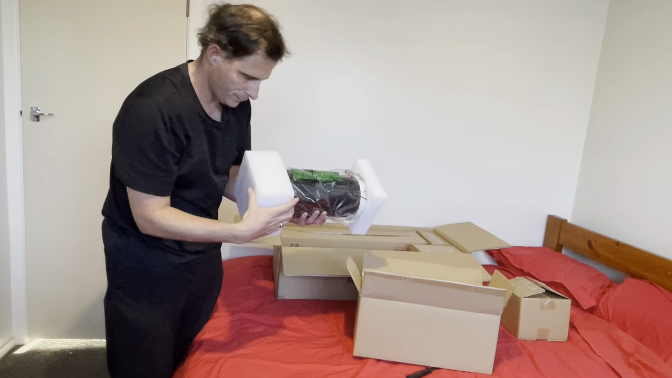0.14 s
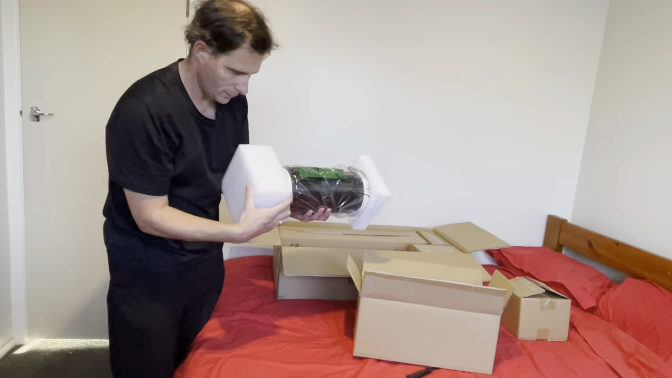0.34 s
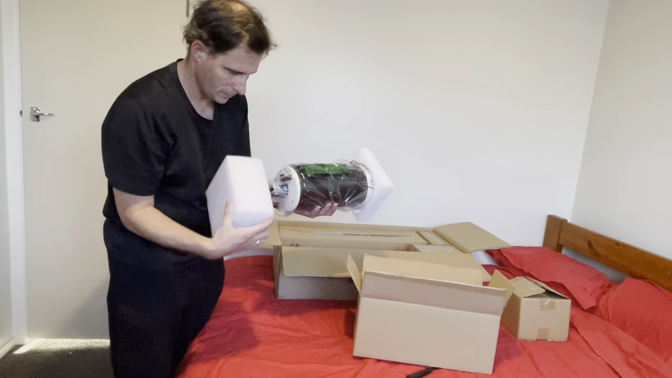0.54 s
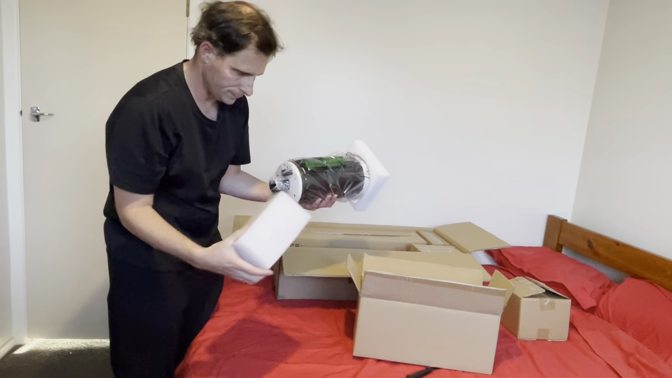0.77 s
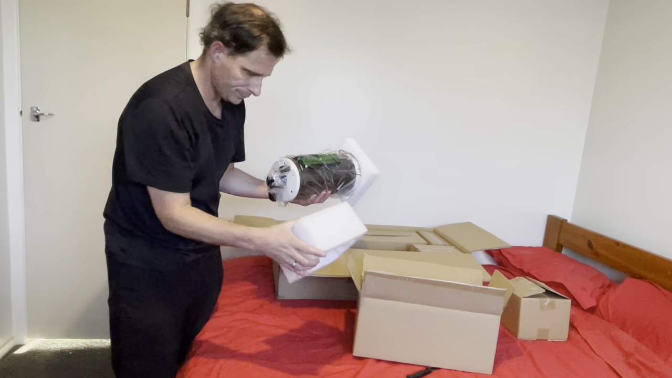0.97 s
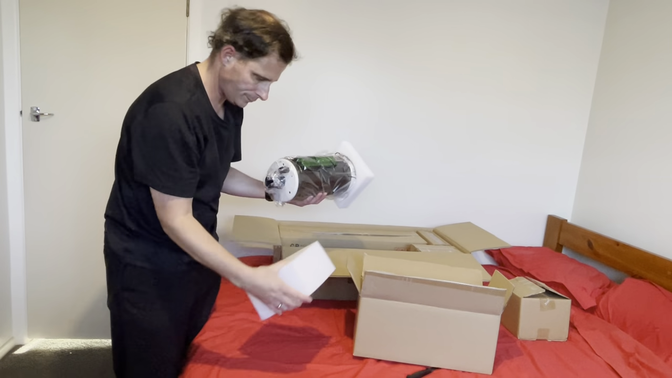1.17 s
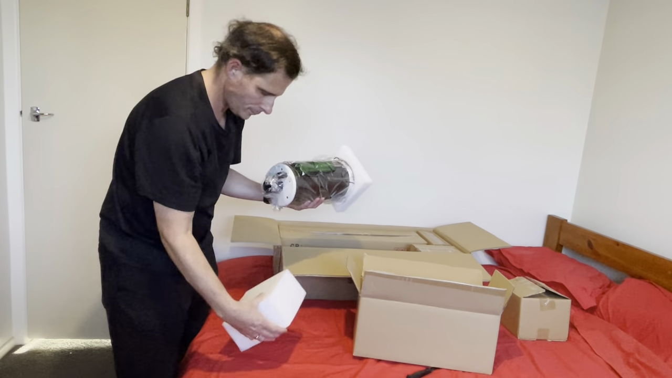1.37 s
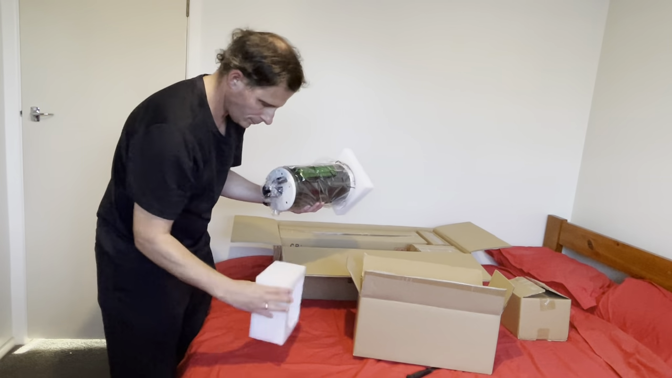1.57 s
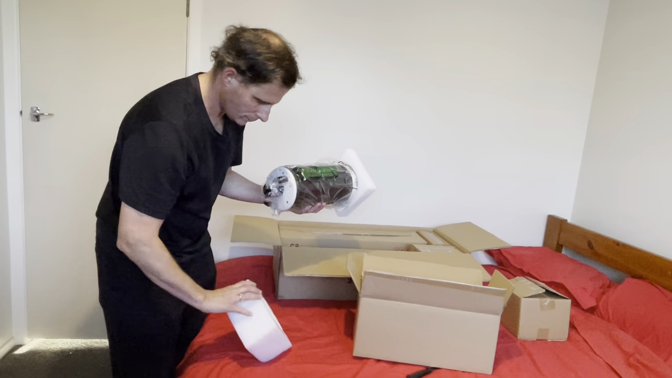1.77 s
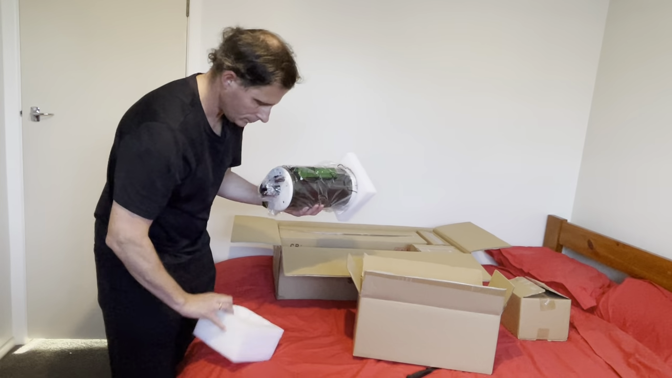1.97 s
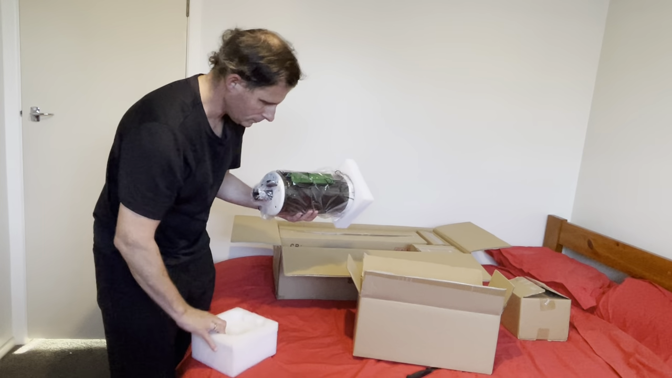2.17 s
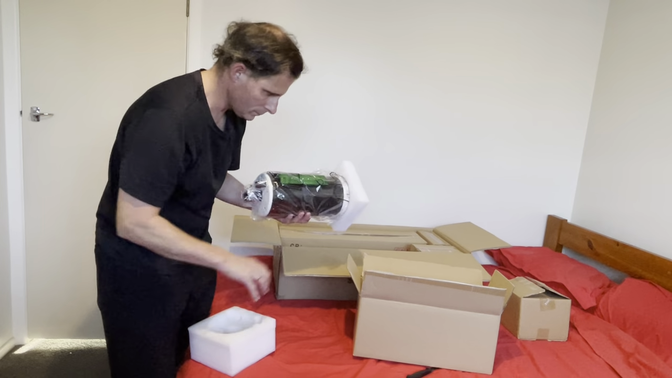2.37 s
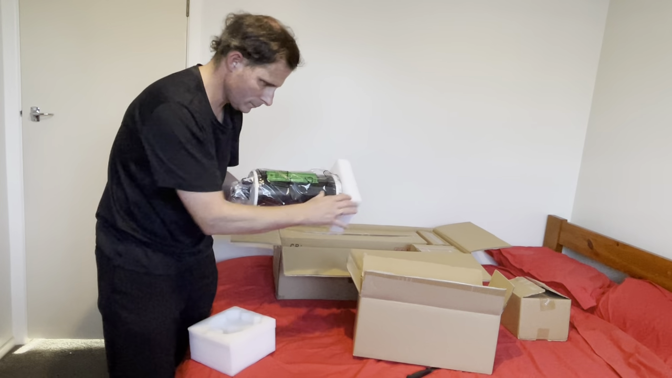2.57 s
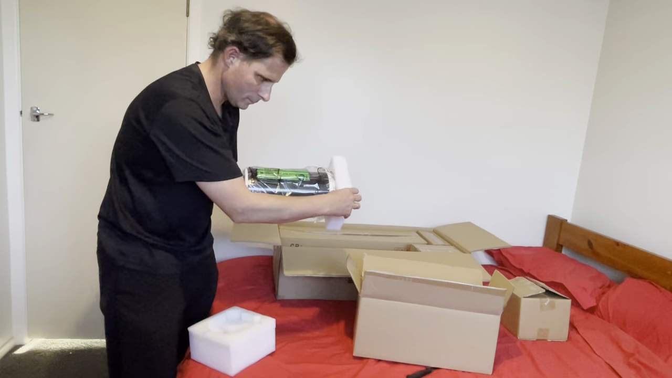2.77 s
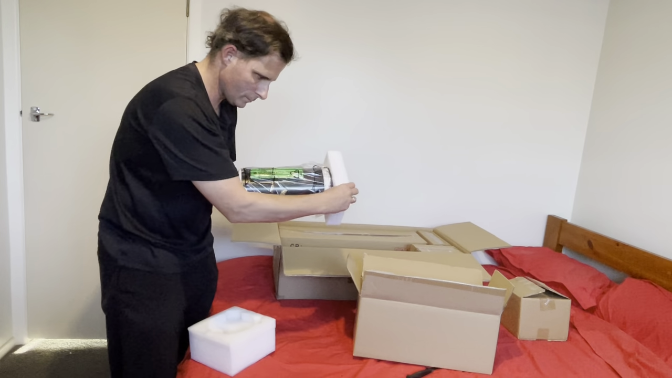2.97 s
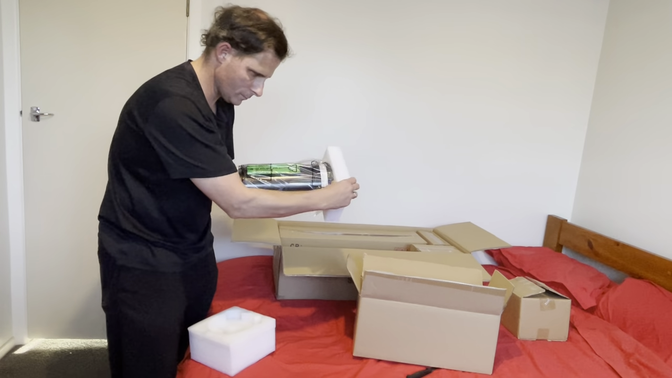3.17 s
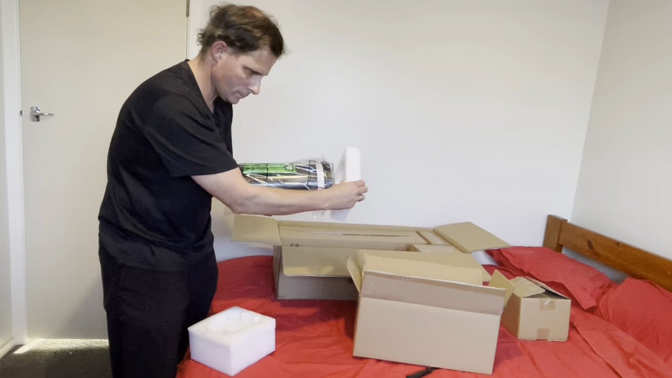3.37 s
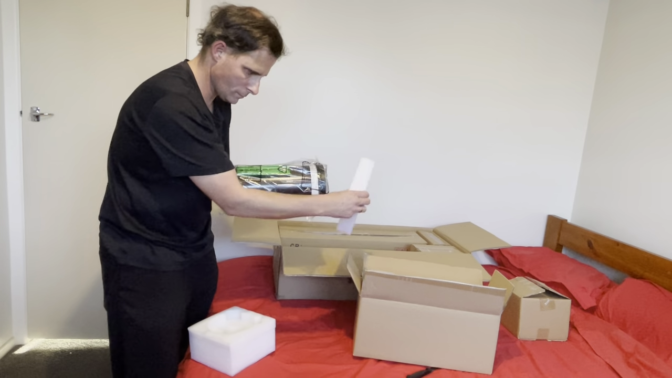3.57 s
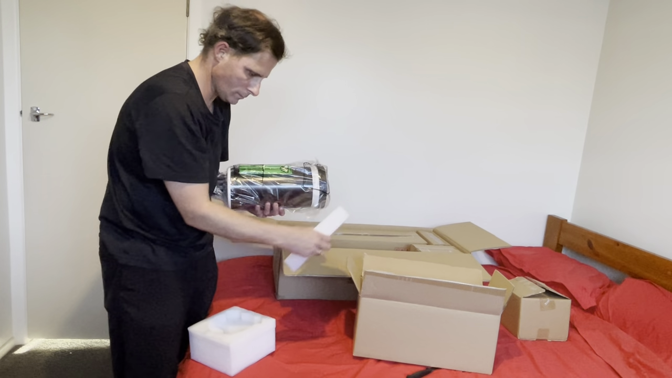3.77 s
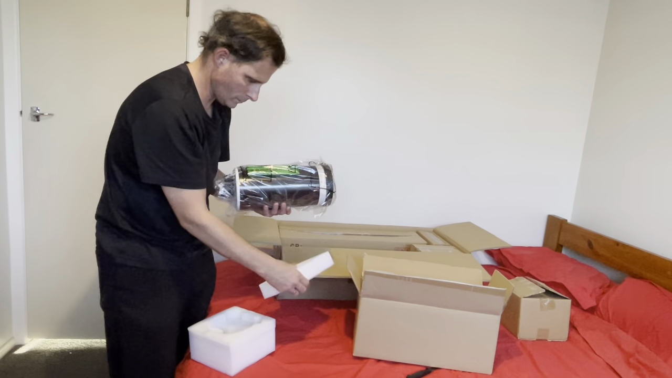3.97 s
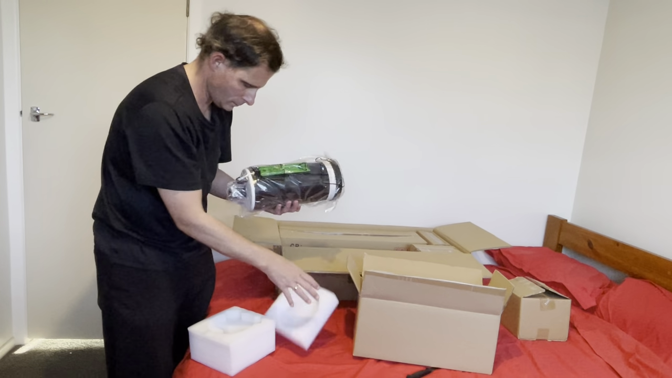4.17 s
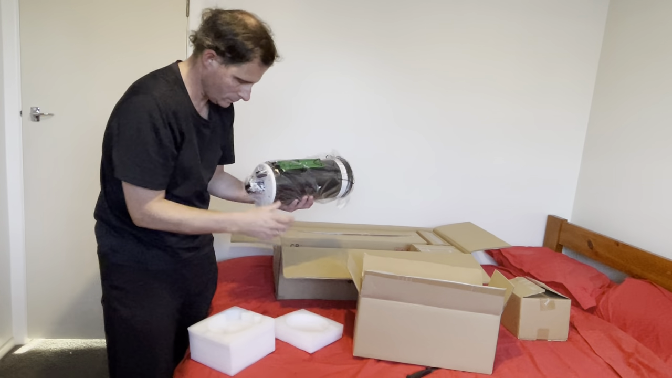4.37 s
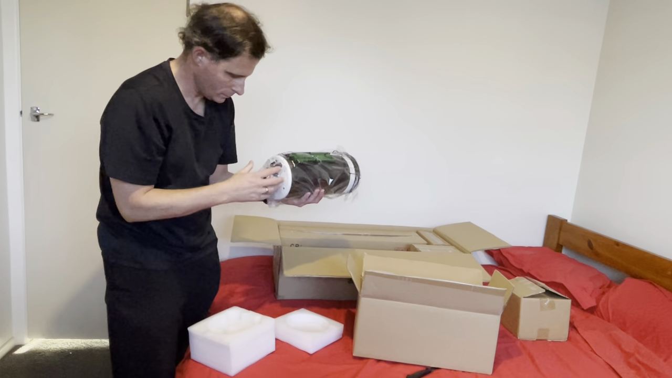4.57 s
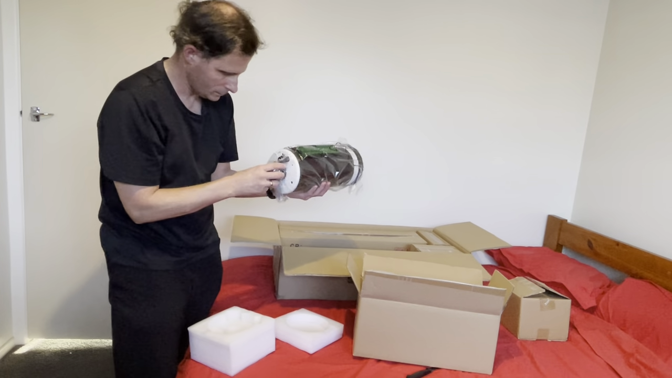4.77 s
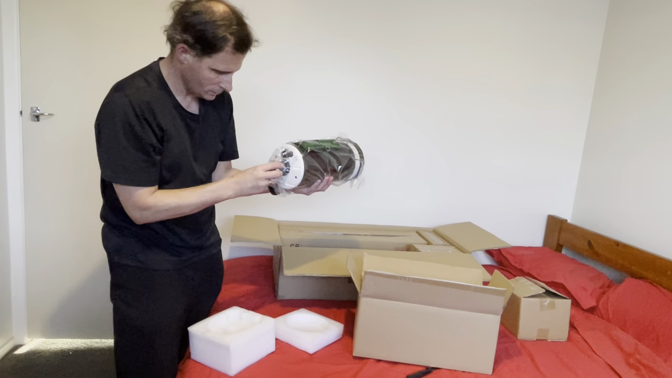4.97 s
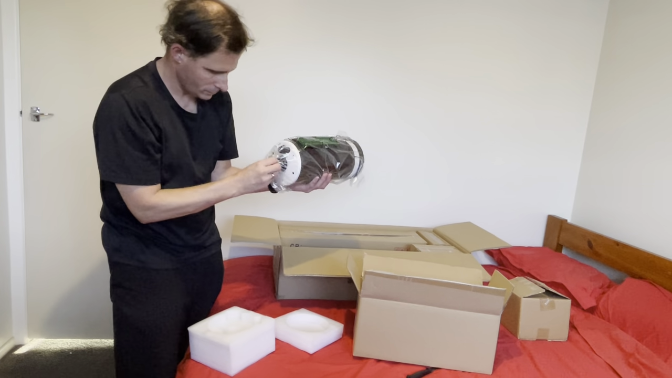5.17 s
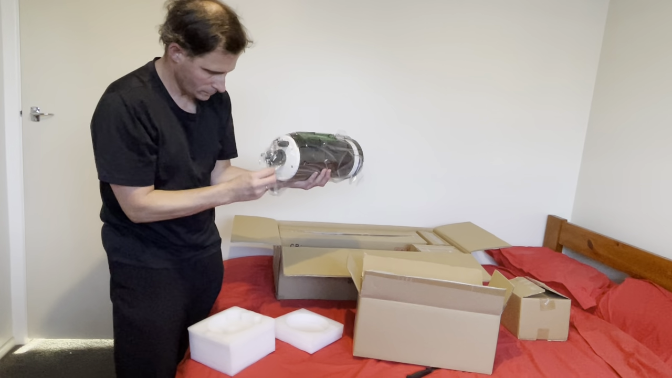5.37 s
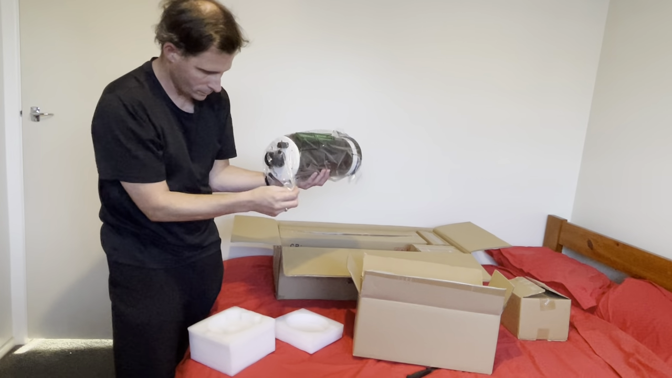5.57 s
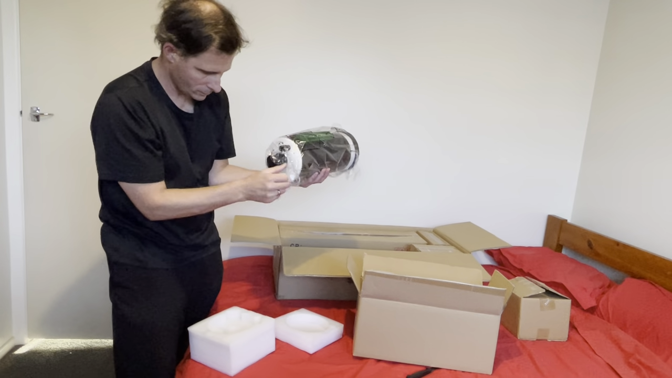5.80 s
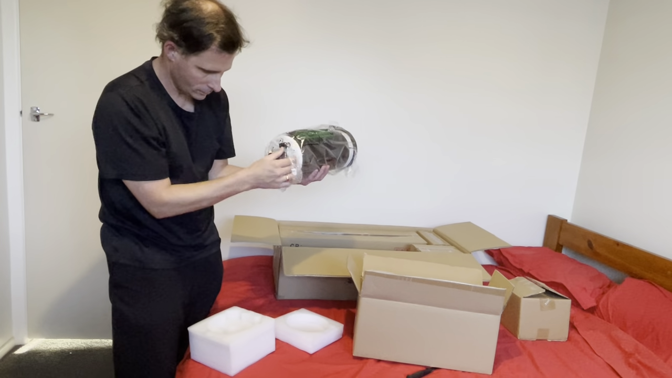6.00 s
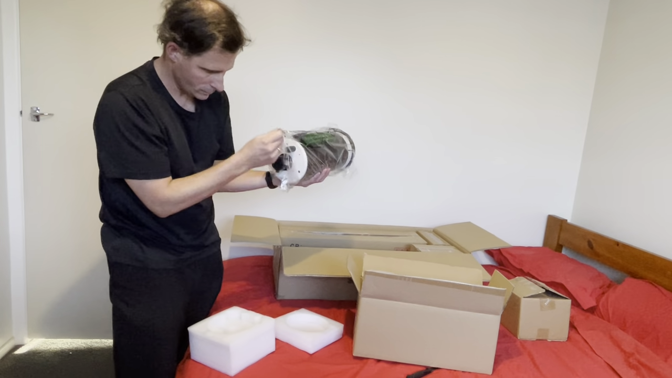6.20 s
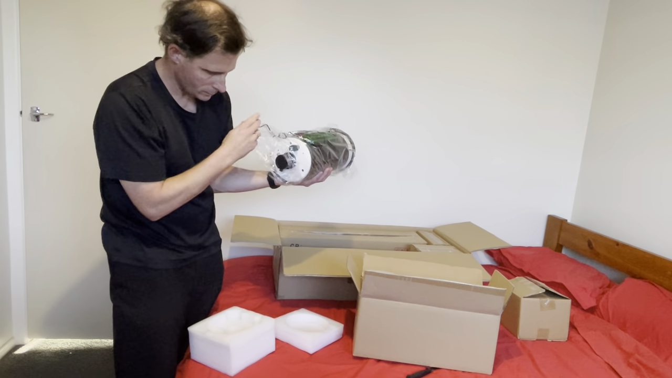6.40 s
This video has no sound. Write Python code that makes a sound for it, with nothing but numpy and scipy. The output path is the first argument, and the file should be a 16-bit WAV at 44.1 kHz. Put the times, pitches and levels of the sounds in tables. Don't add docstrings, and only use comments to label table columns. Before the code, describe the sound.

Unpacking in a bedroom: foam slides squeakily off a film-wrapped cylinder, soft mattress thumps, then plastic wrap peeled in dense crisp crackling.

```python
import sys
import numpy as np
from scipy import signal
from scipy.fft import rfft, irfft, next_fast_len
from scipy.io import wavfile
from scipy.ndimage import uniform_filter1d, map_coordinates

SR = 44100
rng = np.random.default_rng(int(sys.argv[2]) if len(sys.argv) > 2 else 0)


def unload_audio(sound):
    columns = np.transpose(np.atleast_2d(sound))
    steps = np.round(np.clip(columns, -1, 1) * 32767)
    wavfile.write(sys.argv[1], SR, steps.astype(np.int16))


def to_linear_factor(level_db):
    exponent = np.asarray(level_db, float) / 20
    return 10 ** exponent


N = 284114

# full_force_s, film_db, rise_s (per 20 dB), hold_s, foam_over_film_db
FIRST_BLOCK_STROKES = [(0.0, -50.5, .05, 0.0027, -0.5), (0.138, -54.5, 0.16, 0.0062, -0.5),
                       (0.366, -49.5, 0.2155, 0.0082, 9.5), (0.464, -71.5, 6, 0.022, -2),
                       (0.519, -63.5, 0.17, 0.025, -0.5), (0.61, -79, 0, 0.049, 8),
                       (0.66, -73, -0.54, .02, 4), (0.814, -58, .05, 0.0096, 2),
                       (0.862, -75, -0.1, 0.05, 13.5), (0.95, -79, 0.2, 0.027, -3), (1.057, -85, 0, .1, -3),
                       (1.175, -68.5, 0, 0.037, 8), (1.239, -61.5, -0.07, 0.046, 3.5),
                       (1.336, -73, 0.2, 0.025, 8), (1.378, -65.5, 0.09, 0.015, 9),
                       (1.481, -60, 0.07, 0.0036, 6), (1.581, -65, 0.24, 0.012, 2.5),
                       (1.718, -50, -0.0831, 0.028, 2), (1.833, -59, 0.18, 0.28, 5.5),
                       (2.048, -44.5, 0.08, 0.0054, 4), (2.176, -55.5, 0.28, 0.04, 4),
                       (2.264, -58, 0.48, 0.012, 5.5)]
# full_force_s, film_db, rise_s (per 20 dB), hold_s, foam_over_film_db
SECOND_BLOCK_STROKES = [(2.462, -73.5, 0.058, .05, -10), (2.561, -67.5, 0.18, 0.043, -4.5),
                        (2.658, -60.5, 0.015, 0.0031, -33), (2.787, -53.5, 0.02, 0.0093, 2.5),
                        (2.809, -51, 0.04, 0.0059, 5.5), (2.86, -59.5, .08, 0.067, 2.5),
                        (2.972, -56, 0.099, 0.017, -1), (3.069, -53, .12, 0.0052, -1),
                        (3.183, -61.5, 0.16, 0.054, 3), (3.292, -51, 0.24, 0.032, -8),
                        (3.391, -42.5, 0.14, 0.0029, 1.5), (3.5, -66, 0.07, 0.06, -10),
                        (3.594, -72, 0.097, 0.0083, 5.5), (3.688, -64, 0.06, 0.0046, -4.5),
                        (3.802, -70, 0.033, 0.0038, -5), (3.985, -74, 0.0051, .01, 9),
                        (4.026, -58.5, 0.053, .1, 8), (4.238, -58.5, 0.033, 0.0033, 1),
                        (4.408, -67, 0.089, 0.0046, 5.5), (4.456, -75, .03, 0.016, 4),
                        (4.503, -71, .02, .005, -21), (4.562, -79, 0.045, 0.053, -7)]
# full_force_s, film_db, rise_s (per 20 dB), hold_s, foam_over_film_db
PEELING_STROKES = [(4.631, -58.5, 0.034, 0.041, -2.5), (4.702, -52.5, 0.048, 0.03, -7),
                   (4.74, -52, 0.12, 0.037, -3.5), (4.81, -55, 0.18, 0.034, 0),
                   (4.921, -52, 0.29, 0.062, 0.5), (5.1, -53.5, 0.21, 0.0045, 0.5),
                   (5.164, -53, 0.12, 0.026, -7), (5.326, -47.5, 0.19, 0.11, 3.5),
                   (5.507, -43.5, 0.22, 0.017, 3), (5.58, -51.5, 0.29, 0.08, -6),
                   (5.67, -47, 0.24, 0.052, -2), (5.78, -57, 0.55, 0.13, 2.5),
                   (6.0, -52.5, 0.31, 0.057, 0.5), (6.083, -44, 0.05, 0.069, -3.5),
                   (6.18, -39, 0.03, 0.023, -3), (6.255, -44.5, 0.34, 0.1, 1.5),
                   (6.394, -40.5, 0.27, 0.0027, -5.5)]
# full_force_s, level_db, rise_s (per 20 dB), hold_s
GRIPS = [(0.13, -57.5, -0.2, 0.0089), (0.314, -50.5, 0.14, 0.083), (1.333, -64.5, 0.57, 0.057),
         (1.6, -62, 0.4, .005), (1.792, -60.5, -8, 0.0045), (2.06, -54, -0.6, 0.033),
         (2.807, -49.5, -0.05, .005), (3.087, -68.5, -0.04, .005), (3.24, -65, 0.18, .08),
         (3.341, -46.5, -0.08, .005), (3.382, -41, -0.024, 0.0031), (3.996, -58, 0.04, .005),
         (4.123, -55.5, 0.09, 0.0063), (4.23, -52.5, -0.22, 0.0044), (4.716, -64, .05, 0.093),
         (5.097, -63, 0.18, 0.084), (5.34, -48.5, 0.17, 0.082), (5.51, -50, 0.19, .005),
         (5.654, -50.5, 0.13, .005), (6.197, -50.5, 0.5, 0.017), (6.377, -47.5, 0.6, .005)]
# time_s, pitch_hz
FOAM_PITCH = [(0.0, 1343), (.45, 1197), (.54, 822), (.64, 1400), (1.001, 1115), (1.87, 1465), (1.939, 856),
              (2.1, 1474), (2.33, 1194), (2.799, 1790), (3.0, 1920), (3.201, 1010), (3.29, 1400),
              (3.359, 960), (4.0, 1200), (4.12, 1790), (4.232, 930), (4.7, 1890), (5.35, 1640),
              (6.44, 1327)]
# frequency_hz, level_db (per Hz)
FILM_SPECTRUM = [(1500, -18), (1810, -9), (3140, -6.5), (4220, -5.5), (5550, -5.5), (6440, -5), (8730, -8),
                 (8800, -4.5)]
# frequency_hz, level_db
FILM_TOP = [(8600, 0), (9200, 1), (10200, 0), (11900, -11), (12600, -18), (13300, -24), (14000, -50),
            (16000, -70)]
# frequency_hz, level_db (per Hz)
HOLLOW_SPECTRUM = [(120, -13.5), (200, -4.5), (300, -2), (420, -0.5), (560, 2.5), (750, -0.5), (1200, -64)]
# start_s, peak_db, t60_s
TICKS = [(0.0958, -33.5, 0.16), (.209, -36, 0.38), (0.7435, -48, 0.097), (0.761, -47, 0.21),
         (1.23, -40, 0.35), (1.4553, -56.5, .1), (1.7144, -53, .041), (2.4507, -48, .1),
         (2.5498, -35.5, 0.045), (2.6632, -37, 0.099), (2.7816, -46, 0.048), (2.841, -30, 0.11),
         (2.964, -32.5, 0.1), (3.14, -31, 0.075), (3.273, -26.5, .095), (3.682, -53.5, .065),
         (3.8023, -47, 0.088), (4.358, -48, 0.037), (4.49, -48.5, 0.089), (4.5775, -52, 0.05),
         (4.6214, -45.5, 0.068), (4.655, -59, 0.042), (4.6806, -42, .08), (4.685, -32.5, 0.09),
         (5.166, -32, 0.044), (5.6924, -46, 0.07)]
# start_s, peak_db, knock_over_snap_db, knock_hz
KNOCKS = [(0.249, -46, -9, 1840), (.5177, -47, -7, 785), (0.7895, -45, -11, 1750),
          (1.1682, -48.5, -6.5, 1310), (1.5537, -37.5, -8.5, 680), (2.0343, -32, -7, 1376),
          (2.0829, -26.5, -2, 1930), (2.2641, -37.5, -3, 834), (3.3875, -22.5, -13.5, 1230),
          (3.6598, -68, 6, 1710), (3.9784, -51, 1, 1204), (4.0113, -38.5, -17, 1160),
          (4.0641, -36, -5, 525), (4.2198, -49, 6.5, 560), (4.385, -54, 4, 613), (4.4, -41, -8, 1910),
          (5.2811, -30.5, -12, 1790), (5.4968, -24, -11.5, 530), (6.0532, -34.5, -4.5, 1295),
          (6.1769, -23.5, -5, 1160), (6.3344, -30, -20, 636)]
# start_s, peak_db
FLICKS = [(0.7437, -53), (2.6614, -48), (2.7816, -56), (4.357, -56), (4.4907, -49), (4.5775, -59),
          (4.6204, -50), (4.6563, -50.5), (4.6818, -33.5), (5.1664, -35), (5.692, -31)]
# start_s, length_s, level_db
SHEEN = [(0.092, 0.065, -82.5), (0.201, 0.044, -84), (2.638, 0.038, -89), (2.773, 0.032, -92),
         (2.826, 0.054, -77), (3.315, 0.054, -78), (4.666, 0.07, -87), (5.06, 0.057, -87.5),
         (5.268, 0.26, -76), (5.676, 0.042, -74), (5.876, 0.05, -81), (6.081, 0.33, -73)]
# full_force_s, level_db, rise_s (per 20 dB), hold_s, pitch_hz
SQUEAKS = [(0.108, -65.5, -0.18, 0.042, 1200), (0.256, -59.5, 0.1, 0.042, 1150),
           (0.326, -52, -0.54, 0.037, 1240), (0.521, -66, -0.7, 0.016, 830),
           (1.73, -57.5, 0.03, 0.086, 1310), (1.889, -60.5, -0.2, 0.041, 808),
           (1.96, -55.5, 0.1, 0.043, 838), (2.02, -48.5, .02, .025, 1426), (2.089, -47.5, .03, 0.02, 1880),
           (2.155, -49.5, 0, 0.053, 1415), (2.24, -72, 0.3, 0.011, 1400), (2.65, -69, .01, 0.027, 1580),
           (2.695, -77, -0.2, 0.016, 1400), (3.214, -70, -0.44, 0.046, 1180),
           (4.394, -69.5, 0.12, 0.023, 628), (4.726, -65.5, -0.02, 0.26, 2030),
           (5.088, -60.5, -0.01, .12, 1950), (5.3, -50.5, 0, 0.18, 1900), (5.489, -56, 0.7, 0.019, 628),
           (6.172, -49.5, -0.08, .03, 1150)]
# start_s, peak_db, upper_mode_over_it_db
THUMPS = [(0.332, -74.5, -8), (1.653, -74, 7), (2.051, -67, 14), (2.273, -63, 3.5), (2.816, -66, 4),
          (3.998, -69, 0), (4.233, -55, -1), (4.388, -72, 9), (5.499, -77.5, 22), (6.119, -72, 7),
          (6.199, -68, 8), (6.3, -70, 10)]
# full_force_s, level_db, rise_s (per 20 dB), hold_s
PRESSES = [
    (1.65, -69, -0.63, .005),
    (2.063, -58, -1, 0.019),
    (2.845, -68, -0.65, .005),
    (2.887, -72.5, 0.7, 0.053),
    (3.402, -60.5, -0.3, 0.017),
    (3.994, -57, -0.14, 0.038),
    (4.231, -54, 0, 0.0058),
]
# frequency_hz, level_db (per Hz)
AIR_SPECTRUM = [(22, -56), (38, 2), (52, 0), (72, -3.5), (100, -2), (128, -12), (190, -12), (300, -14.5),
                (600, -21), (2000, -27), (10000, -42), (13000, -73), (15500, -54)]
# frequency_hz, likeness (0 to 1)
AIR_LIKENESS = [(60, 0), (300, 0), (1000, 0.023), (9000, 0.34)]
# frequency_hz, t60_s
WALLS = [(100, 0.12), (1000, 0.69), (8000, 0.23)]
# centre_hz, width_hz, level_db
ROOM_PEAKS = [(272, 22, 2), (415, 17, 3), (527, 26, 1.5), (947, 6.7, -2), (1175, 16, 1.5), (1310, 18, 3),
              (1413, 21, 1.5), (1590, 16, 0), (1820, 35, 2.5), (1998, 16, 1.5), (2320, 41, 2.5)]
# frequency_hz, left_minus_right_db
LEAN = [(100, 0.5), (500, -0.2), (1300, 1.5), (2300, 0.5), (3600, 1.5), (5600, 6), (7000, 2.5), (8000, 1.5)]

FILM_FADES, FOAM_FADES, BODY_FADES = 229, 220, 227
SQUEAK_FADES, SHEET_FADES, SHEEN_FADES = 610, 205, 1500
RISE_BENDS = 0.75
BODY_DB, BODY_WITH_FOAM = -10.5, 0.4
IDLE_DB = -95.5
TICK_KNOCK_DB, TICK_KNOCK_HZ, KNOCK_T60_S = -27.5, 1400, 0.11
FLICK_T60_S, FLICK_DB = 0.015, 4
LONG_S = 0.0505
MATTRESS_HZ, MATTRESS_T60_S = 54.4, 0.18
AIR_DB = -72.5
SPLIT_HZ, IN_STEP_HZ, TURN_HZ = 8800, 11900, 3600


def unit(x):
    return x / np.sqrt(np.mean(x ** 2) + 1e-20)


def along(points, hz):
    f, v = np.transpose(points)
    return np.interp(np.log(hz + 1), np.log(f + 1), v)


def wobble(rate):
    knots = rng.standard_normal(int(N * rate / SR) + 4)
    return map_coordinates(knots, [np.arange(N) * rate / SR])


def filtered(x, response):
    m = next_fast_len(N + SR // 2)
    return irfft(rfft(x, m) * response(np.fft.rfftfreq(m, 1 / SR)), m)[..., :N]


def between(hz, lo_hz, hi_hz):
    return 1 / np.sqrt((1 + (lo_hz / (hz + 1)) ** 6) * (1 + (hz / hi_hz) ** 6))


def swells(s, db, rise_s, hold_s, fades):
    t = np.arange(0, N + 64, 64)[:, None] / SR
    early = np.maximum(s - t, 0) / np.maximum(rise_s, 0.003)
    late_s = np.maximum(t - s - np.abs(hold_s), 0)
    level_db = db - 20 * early * (1 + RISE_BENDS * early ** 2) - fades * late_s
    gain = np.sqrt(np.sum(to_linear_factor(2 * level_db), axis=1))
    return np.interp(np.arange(N) / SR, t[:, 0], gain)


def crackle(rate, spread_db, clump_db):
    size = to_linear_factor(spread_db * np.minimum(rng.exponential(size=N), 4) + clump_db * wobble(70))
    return unit((rng.random(N) < rate / SR) * size * rng.choice([-1, 1], N))


def rings(pitch_hz, scatter, cycles, spread_db, overtone, overtone_db, count):
    start = rng.integers(0, N, count)
    draw = rng.standard_normal((count, 2))
    hz = pitch_hz[start] * np.exp(scatter * draw[:, 0])
    turns = hz[:, None] * np.arange(600) / SR
    tone = np.sin(2 * np.pi * turns) + to_linear_factor(overtone_db) * np.sin(2 * np.pi * overtone * turns)
    ring = to_linear_factor(spread_db * draw[:, 1:] - 60 * turns / cycles) * tone
    places = start[:, None] + np.arange(600)
    return unit(np.bincount(places.ravel(), ring.ravel())[:N])


def heard(x, direct_db, lag, size):
    hz, t, z = signal.stft(x, SR, nperseg=size)
    keep = to_linear_factor(-120 * (t[1] - t[0]) / along(WALLS, hz))
    energy = np.array([signal.lfilter([1 - k], [1, -k], row) for k, row in zip(keep, np.abs(z) ** 2)])
    hiss = signal.stft(rng.standard_normal((2, N)), SR, nperseg=size)[2]
    walls = unit(signal.istft(hiss * np.sqrt(energy), SR, nperseg=size)[1][:, :N])
    port_lag = lag * np.array([[0], [1]])
    direct = filtered(unit(x), lambda f: np.exp(-2j * np.pi * f * port_lag))
    return walls + to_linear_factor(direct_db) * direct


def shifting(x, fine_db, broad_db):
    def field(shape, high, long):
        noise = uniform_filter1d(rng.standard_normal(shape), size=high, axis=-2)
        return unit(uniform_filter1d(noise, size=long, axis=-1))

    z = signal.stft(x, nperseg=1024)[2]
    gain = to_linear_factor(fine_db * field(z.shape, 2, 8) + broad_db * field(z.shape[1:], 24, 6))
    return signal.istft(z * unit(gain), nperseg=1024)[1][:, :N]


def film_colour(hz):
    return to_linear_factor(along(FILM_SPECTRUM, np.minimum(hz, SPLIT_HZ)) + along(FILM_TOP, hz))


def film_crackle():
    clicks = heard(crackle(rate=5000, spread_db=2.3, clump_db=1.8), direct_db=-3.5, lag=0.0001, size=128)
    moving = shifting(clicks, fine_db=2, broad_db=1)
    return unit(filtered(moving, lambda f: film_colour(f) * between(f, 1400, 15000)))


def foam_rub():
    pitch_hz = np.interp(np.arange(N) / SR, *np.transpose(FOAM_PITCH))
    foam = rings(pitch_hz, scatter=0.325, cycles=32, spread_db=1.5, overtone=2.1, overtone_db=-0.5, count=4500)
    moving = shifting(heard(foam, direct_db=-5, lag=0.0001, size=512), fine_db=3.5, broad_db=1)
    return unit(filtered(moving, lambda f: between(f, 360, 9900)))


def hollow_body():
    slips = heard(crackle(rate=1800, spread_db=3, clump_db=1), direct_db=-2, lag=0.00041, size=512)
    moving = shifting(slips, fine_db=5.5, broad_db=1.5)
    return unit(filtered(moving, lambda f: to_linear_factor(along(HOLLOW_SPECTRUM, f))))


def hands():
    strokes = FIRST_BLOCK_STROKES + SECOND_BLOCK_STROKES + PEELING_STROKES
    s, db, rise_s, hold_s, foam_db = np.transpose(strokes)
    film_level = swells(s, db + 4.5, rise_s, hold_s, FILM_FADES) + to_linear_factor(IDLE_DB)
    foam_level = swells(s, db + foam_db - 2.03, rise_s, hold_s, FOAM_FADES)
    body_db = db + BODY_DB + BODY_WITH_FOAM * foam_db
    stroke_level = swells(s, body_db, rise_s, hold_s, BODY_FADES)
    grip_level = swells(*np.transpose(GRIPS), BODY_FADES)
    body_level = to_linear_factor(-3) * np.hypot(stroke_level, grip_level)
    return film_level * film_crackle() + foam_level * foam_rub() + body_level * hollow_body()


def snaps():
    bright, dull = np.zeros((2, 2, N + SR))
    t = np.arange(SR // 4) / SR
    ticks = [(s, db, TICK_KNOCK_DB, TICK_KNOCK_HZ, t60) for s, db, t60 in TICKS]
    knocks = [(*row, KNOCK_T60_S) for row in KNOCKS]
    for s, db, knock_db, hz, t60 in ticks + knocks:
        here = slice(round(s * SR), round(s * SR) + len(t))
        fade = to_linear_factor(-60 * t / t60)
        noise = rng.standard_normal((2, 2, len(t)))
        click = 1.66 * to_linear_factor(-60 * t / 0.0041) * noise[0, 0]
        rattle = fade * (1 - np.exp(-t / 0.0012)) * noise[0]
        unsteady = np.cumsum(noise[1], axis=1) * 0.026
        knock = np.sin(2 * np.pi * hz * t + unsteady) + 2.5 * noise[1]
        bright[:, here] += to_linear_factor(db - 8) * (rattle + click)
        dull[:, here] += to_linear_factor(db + knock_db - 4) * fade * (1 - np.exp(-t / 0.01)) * knock
    film = filtered(bright[:, :N], lambda f: film_colour(f) * between(f, 1900, 20000))
    return film + filtered(dull[:, :N], lambda f: between(f, 510, 4240))


def flicks():
    out, t = np.zeros((2, N + SR)), np.arange(SR // 10) / SR
    for s, db in FLICKS:
        burst = rng.standard_normal((3, len(t)))
        fade = to_linear_factor(db + FLICK_DB - 60 * t / FLICK_T60_S)
        out[:, round(s * SR):][:, :len(t)] += fade * (burst[0] + 0.75 * burst[1:])
    return filtered(out[:, :N], lambda f: between(f, 7000, 10800) ** 2)


def sheen():
    s, length, db = np.transpose(SHEEN)
    out = 0
    for rows, lo_hz, hi_hz in ((length > LONG_S, 14600, 15250), (length <= LONG_S, 14000, 15800)):
        fizz = unit(filtered(rng.standard_normal(N), lambda f: (f > lo_hz) * (f < hi_hz)))
        out = out + swells(s[rows], db[rows] + 3, 0.01, length[rows], SHEEN_FADES) * fizz
    return out


def squeak():
    s, db, rise_s, hold_s, hz = np.transpose(SQUEAKS)
    ends_s = np.ravel([s, s + np.abs(hold_s)], "F")
    pitch_hz = np.interp(np.arange(N) / SR, ends_s, np.repeat(hz, 2))
    slips = rings(pitch_hz, scatter=0.035, cycles=50, spread_db=3, overtone=2, overtone_db=-12, count=3000)
    heard_slips = unit(heard(slips, direct_db=5, lag=0.0001, size=512))
    return to_linear_factor(1) * swells(s, db, rise_s, hold_s, SQUEAK_FADES) * heard_slips


def thumps():
    out, t = np.zeros(N + SR), np.arange(SR // 2) / SR
    turn = 2 * np.pi * MATTRESS_HZ * t
    deep = to_linear_factor(-60 * t / MATTRESS_T60_S) * (1 - np.exp(-t / 0.013)) * np.sin(turn)
    upper = to_linear_factor(-100 * t / MATTRESS_T60_S) * (1 - np.exp(-t / 0.015)) * np.sin(1.59 * turn)
    for s, db, upper_db in THUMPS:
        out[round(s * SR):][:len(t)] += to_linear_factor(db + 10.5) * (deep + to_linear_factor(upper_db) * upper)
    return out[:N]


def bedding():
    level = swells(*np.transpose(PRESSES), SHEET_FADES)
    rumble = unit(filtered(rng.standard_normal(N), lambda f: between(f, 95, 270)))
    return filtered(to_linear_factor(-2) * level * rumble, lambda f: between(f, 105, 310))


def air():
    def spread(hz):
        angle = np.arccos(np.clip(along(AIR_LIKENESS, hz), -1, 1)) / 2
        return to_linear_factor(along(AIR_SPECTRUM, hz)) * [np.cos(angle), np.sin(angle)]

    mid, side = filtered(rng.standard_normal((2, N)), spread)
    return to_linear_factor(AIR_DB + 2.7 * wobble(3.02)) * unit(np.array([mid + side, mid - side]))


def standing(x):
    def peaks(f):
        return to_linear_factor(sum(db * np.exp(-((f - hz) / width) ** 2) for hz, width, db in ROOM_PEAKS))

    return filtered(x, peaks)


def scene():
    film = standing(hands() + snaps()) + flicks() + sheen()
    return film + squeak() + thumps() + bedding() + air()


def starved(pair, under_db, slope, chance_db, quiet_db, jump_db):
    hz, t, z = signal.stft(np.array([pair[0] + pair[1], pair[0] - pair[1]]) / 2, SR, nperseg=2048)
    width = 24
    bins = 1024 // width * width
    power = np.abs(z[:, :bins]) ** 2
    band_db = 10 * np.log10(power.reshape(2, -1, width, len(t)).mean(axis=2) + 1e-20)
    main = (hz[:bins] > 8000) & (hz[:bins] < 11000)
    main_db = 10 * np.log10(power[:, main].mean(axis=(0, 1)) + 1e-20)
    over_db = main_db - np.median(main_db)
    hiss_band = hz[:bins:width, None] < 13500
    attack = np.diff(main_db, prepend=0) > jump_db
    limit_db = main_db - under_db - slope * over_db
    limit_db = limit_db - 19 * (over_db < quiet_db) * hiss_band - 12 * ~hiss_band - 9 * attack
    smooth_db = uniform_filter1d(band_db - main_db, size=3, axis=2) + main_db
    kept = smooth_db + chance_db * rng.standard_normal(band_db.shape) > limit_db
    z[:, :bins] *= np.repeat(kept, width, axis=1) | (hz[:bins, None] < 9600)
    mid, side = signal.istft(z, SR, nperseg=2048)[1][:, :N]
    return np.array([mid + side, mid - side])


def low_pass(x):
    return signal.sosfilt(signal.butter(12, 15910, fs=SR, output="sos"), x)


def record(dry):
    sign = np.array([[1], [-1]])
    side = filtered((dry[0] - dry[1]) / 2, lambda f: np.clip(f / 500, 0.6, 1))
    ports = dry.mean(axis=0) + sign * side

    def share(f):
        return np.clip((f - SPLIT_HZ) / 500 + 0.5, 0, 0.92) * np.pi / 2

    def low_band(f):
        return np.cos(share(f)) * to_linear_factor(sign * along(LEAN, f) / 2) * between(f, 42, 15000)

    def top_band(f):
        return np.sin(share(f)) * np.exp(-1j * np.pi * (sign * (f - IN_STEP_HZ) / TURN_HZ + 0.36))

    mix = filtered(ports, low_band) + filtered(ports[0], top_band)
    thinned = starved(mix, under_db=8.6, slope=0.43, chance_db=1.4, quiet_db=-12, jump_db=6)
    return low_pass(thinned)


dry = scene()
out = record(dry)
unload_audio(out)
```